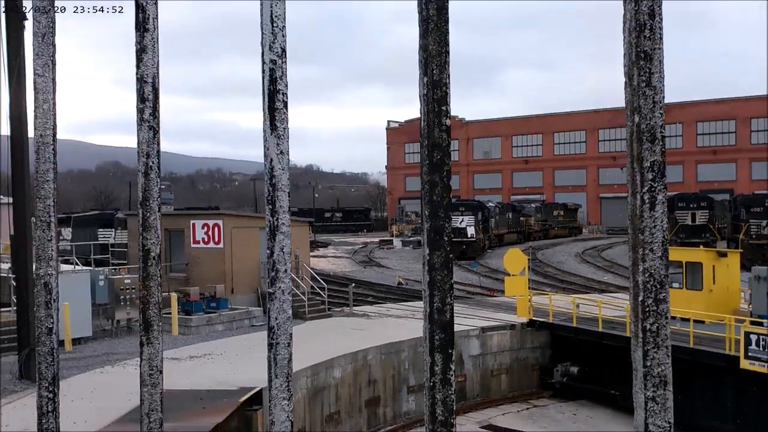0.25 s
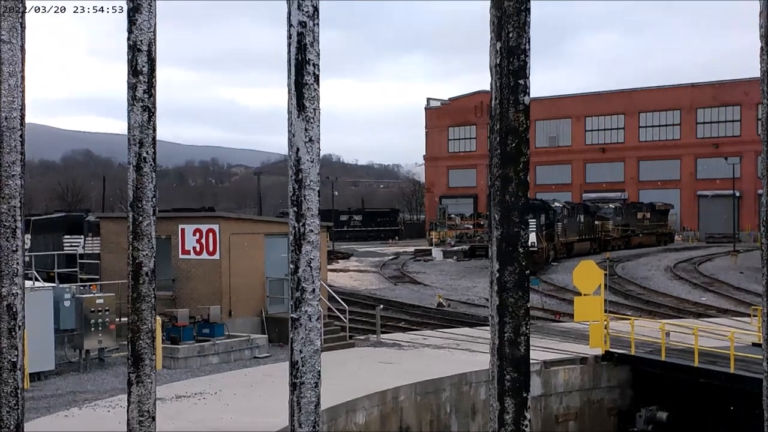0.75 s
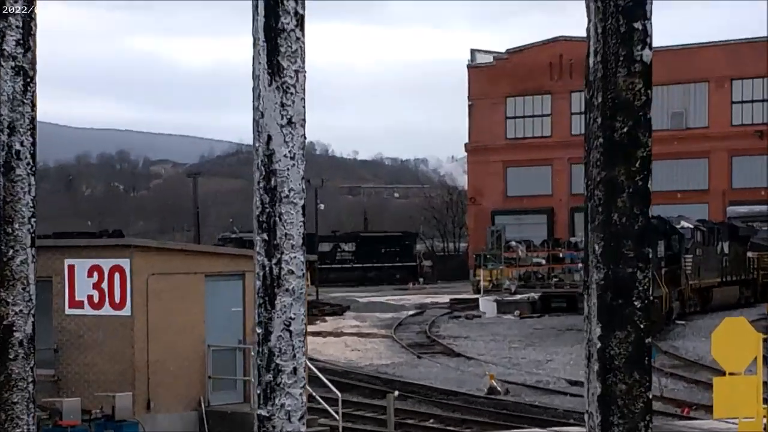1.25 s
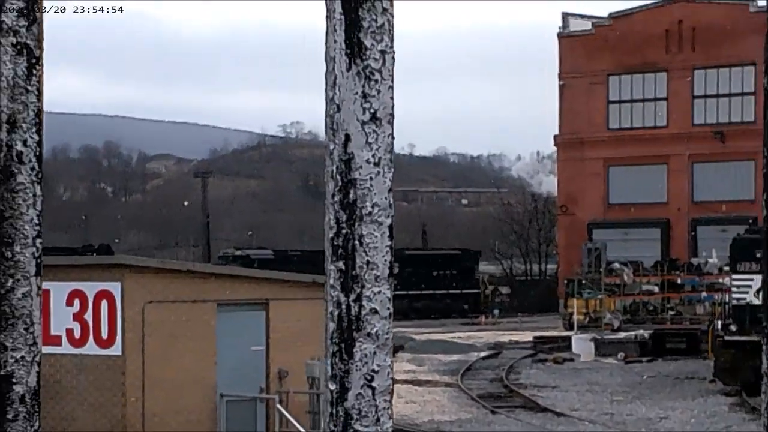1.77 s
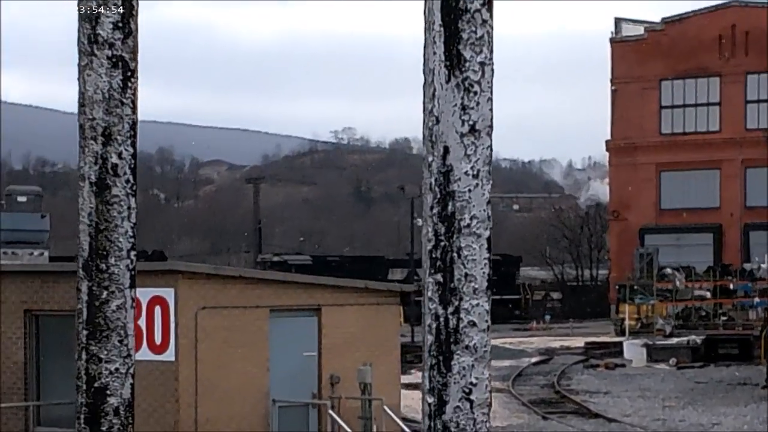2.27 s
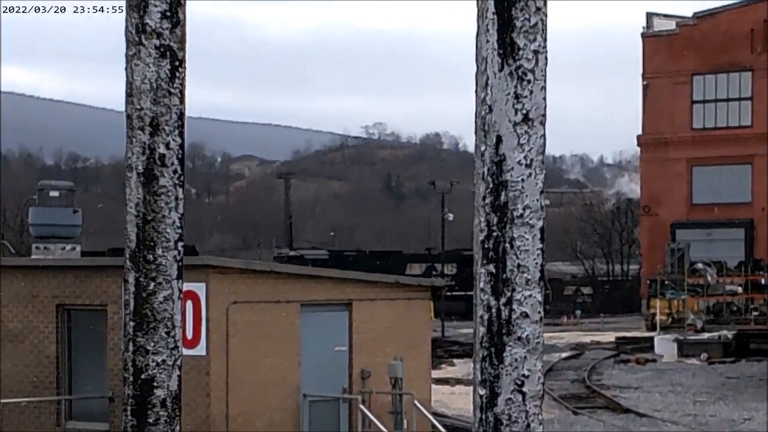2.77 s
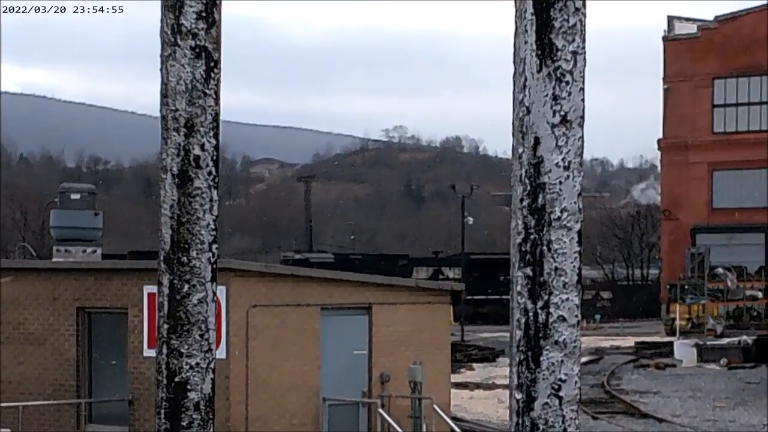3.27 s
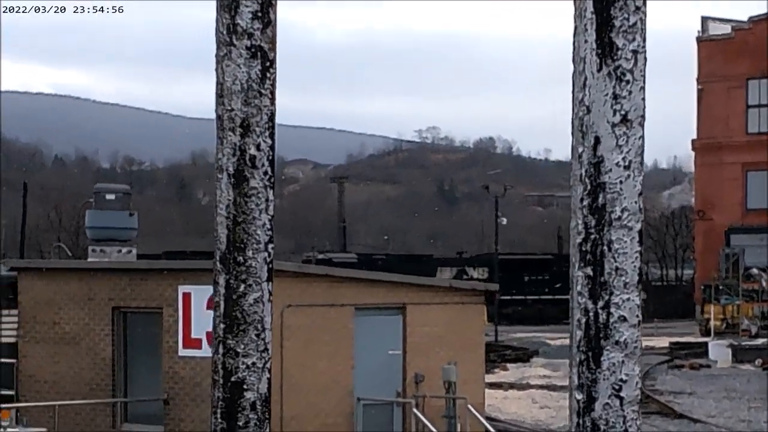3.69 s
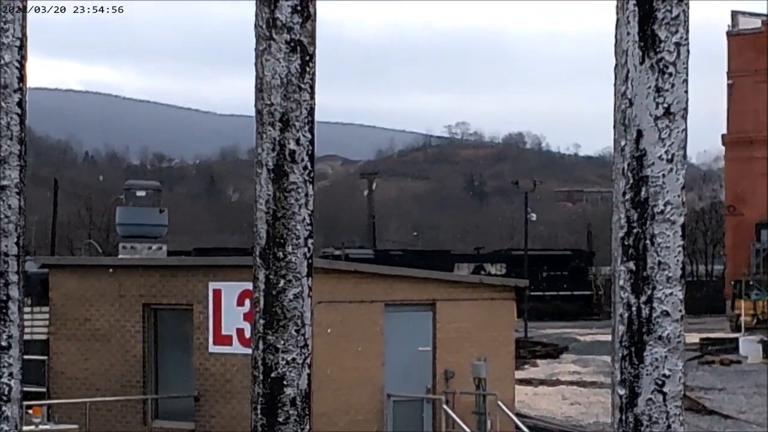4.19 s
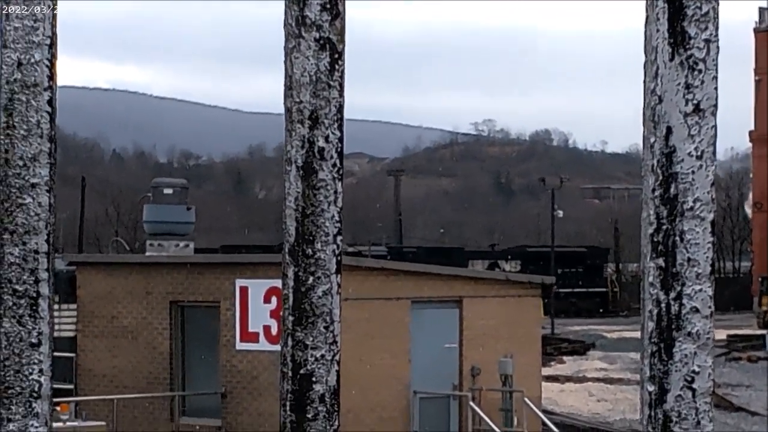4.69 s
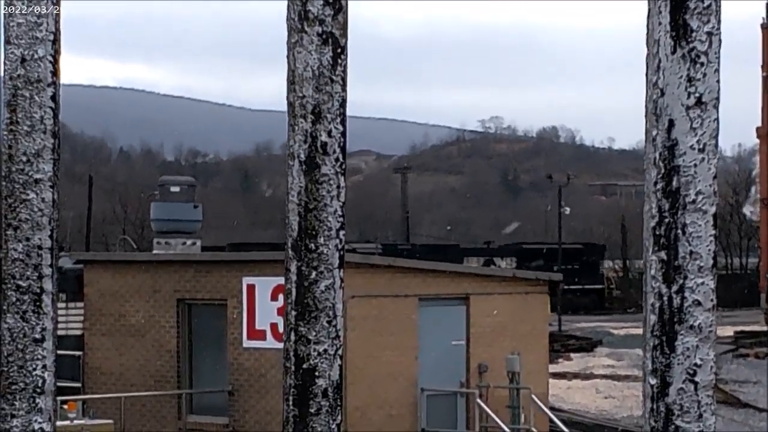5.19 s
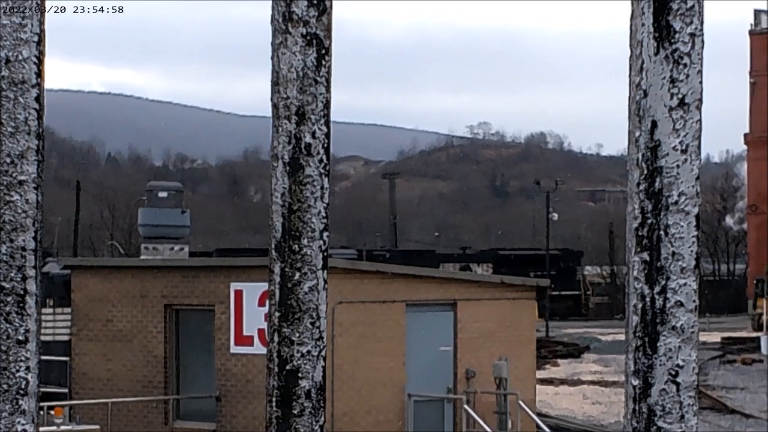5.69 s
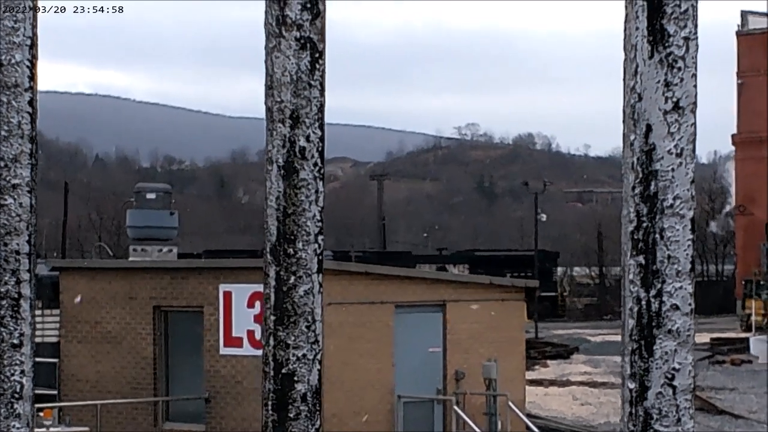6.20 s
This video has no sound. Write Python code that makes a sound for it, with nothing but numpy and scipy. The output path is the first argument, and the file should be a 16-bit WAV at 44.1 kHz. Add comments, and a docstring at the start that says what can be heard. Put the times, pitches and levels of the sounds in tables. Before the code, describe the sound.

Diesel locomotives idle in a rail yard with a deep rumble, while wind buffets the microphone and a few sharp clicks sound.

```python
"""Diesel locomotives idling in a rail yard.

Engine firing makes a low exhaust hum; distant machinery adds rumble, clatter, thin whines and an air leak.
Wind gusts rumble on the port of a small microphone, whose plastic case clicks in the hand.
The electronics add a steady hiss."""
import sys
import numpy as np
from scipy import signal
from scipy.fft import rfft, irfft, next_fast_len
from scipy.io import wavfile

SR = 44100
rng = np.random.default_rng(int(sys.argv[2]) if len(sys.argv) > 2 else 0)


def store_wav(level_fs):
    """Save 16-bit WAV to argv[1]."""
    pcm = np.round(np.clip(np.atleast_2d(level_fs), -1, 1) * 32767)
    wavfile.write(sys.argv[1], SR, pcm.T.astype(np.int16))


N = 284445


def exhaust():
    """Firing tone of an idling diesel over weaker crank orders; all follow one wavering speed."""
    # Each row: time in seconds, firing tone level in dB.
    firing_levels = [(0.0, -26.5), (0.12, -22), (0.93, -21.5), (1.1, -27), (1.3, -21), (1.47, -29.5),
                     (1.59, -23), (1.72, -26), (2.2, -21.5), (2.5, -16.5), (3.33, -20), (3.44, -19.5),
                     (3.98, -22), (4.13, -16), (4.24, -24), (4.35, -20), (5.25, -21.5), (5.9, -17),
                     (6.15, -17.5), (6.45, -14)]
    # Each row: frequency in Hz, level in dB.
    crank_orders = [(61.4, -46), (73.6, -37), (85.9, -41), (98.2, -41)]
    firing_hz = 49.62
    firing_db, = in_time(firing_levels)
    speed = 1 + 0.0053 * drift(3.3)
    orders = sum(amp(db + drift(2.8)) * tone(hz * speed) for hz, db in crank_orders)
    return amp(firing_db + 1.2 * drift(6.0)) * tone(firing_hz * speed) + orders


def machinery():
    """Distant engine rumble, casings rung by valve and pump noise, two whines and leaking air."""
    # Each row: time in seconds, relative clatter level in dB, upper whine in dB, air leak in dB.
    yard_levels = [(0.0, -47, -66, -53), (0.5, -49, -70, -64), (0.8, -48, -60.5, -58.5),
                   (1.35, -49, -67, -55), (2.1, -50, -65.5, -61.5), (2.35, -50.5, -62, -65),
                   (2.5, -50.5, -69, -64), (3.4, -48.5, -69, -64.5), (3.7, -49.5, -62, -65),
                   (4.1, -48.5, -68, -65), (4.35, -48.5, -61, -65), (4.7, -49, -60, -61.5),
                   (5.5, -51, -66.5, -69), (6.45, -52, -59, -66)]
    # Each row: frequency in Hz, relative spectral density in dB.
    rumble_spectrum = [(15, -23), (30, -5), (70, -1.5), (113, -13.5), (264, -11), (460, -18), (700, -25),
                       (1200, -39.5), (1500, -42), (2400, -38), (2600, -48.5), (3400, -54.5), (4600, -59),
                       (7000, -69.5)]
    # Each row: resonance in Hz, width in Hz, level in dB.
    casing_modes = [(1073, 355, -47.5), (1773, 180, -59), (2278, 100, -60.5), (3310, 90, -77),
                    (3500, 53, -75), (4255, 640, -70.5), (4290, 60, -77)]
    rumble_db, lower_whine_db = -27.5, -68
    upper_whine_hz, lower_whine_hz = 2717, 1934
    clatter_db, whine_db, leak_db = in_time(yard_levels)
    swell_db = clatter_db - clatter_db.mean()
    centres_hz, noise = bands(rumble_spectrum, together_db=.4, own_db=.8, rate_hz=8.0)
    treble_share = np.clip(np.log2(centres_hz / 500) / 2, 0, 1)[:, None]
    rumble = amp(rumble_db) * (noise * amp(treble_share * swell_db)).sum(axis=0)
    casings = sum(amp(db + swell_db + 2.3 * drift(15.0)) * narrow_noise(hz, width_hz)
                  for hz, width_hz, db in casing_modes)
    whines = amp(whine_db + 1.8 * drift(25.0)) * tone(upper_whine_hz + 2 * drift(15.0))
    whines += amp(lower_whine_db + 3.4 * drift(4.0)) * tone(lower_whine_hz + 2 * drift(21.0))
    leak = amp(leak_db + 2.0 * drift(9.8)) * narrow_noise(hz=2900, width_hz=480)
    return rumble + casings + whines + leak


def wind():
    """Turbulence on the microphone port: a breeze plus bell-shaped buffets that tilt its spectrum."""
    # Each row: frequency in Hz, relative spectral density in dB.
    wind_spectrum = [(9, -30), (15, -12), (48, -4), (128, -3.5), (376, -9), (455, -9.5), (651, -20),
                     (1200, -30), (1420, -39), (2380, -43), (2600, -47.5), (3000, -56.5), (3500, -62),
                     (5000, -84)]
    # Each row: time in seconds, level in dB.
    breeze_levels = [(0.0, -38.5), (0.8, -35), (1.2, -30.5), (1.6, -35.5), (2.0, -26), (2.4, -27),
                     (2.72, -26), (2.95, -15), (3.3, -14), (3.55, -14.5), (3.7, -20.5), (4.0, -24),
                     (4.45, -27.5), (4.7, -23.5), (5.35, -20), (5.57, -22.5), (5.9, -18.5), (6.1, -25.5),
                     (6.45, -24.5)]
    # Each row: peak time in seconds, level in dB, rise in seconds, tilt in dB per octave.
    buffets = [(1.747, -27.5, .04, -2), (2.211, -18, 0.05, -2.5), (2.487, -12.5, 0.039, 0),
               (2.598, -12.5, 0.031, -0.5), (2.809, -12, 0.018, -1.5), (3.236, -19, 0.05, 3.5),
               (3.569, -16.5, 0.027, 0), (3.822, -18, 0.027, -2), (4.104, -20, 0.058, -1),
               (4.744, -19.5, 0.025, -3), (4.917, -23, 0.037, 0), (5.64, -19, 0.018, -1.5),
               (5.784, -17.5, 0.014, 1), (5.976, -19.5, 0.078, 1.5), (6.141, -17.5, 0.019, -1)]
    breeze_db_per_oct, fall_to_rise = -1, 1.37
    breeze_db, = in_time(breeze_levels)
    power = amp(2 * breeze_db)
    weighted_tilt = power * breeze_db_per_oct
    for peak_s, db, rise_s, db_per_oct in buffets:
        age_s = np.arange(N) / SR - peak_s
        width_s = np.where(age_s > 0, fall_to_rise * rise_s, rise_s)
        buffet_power = amp(2 * db) * np.exp(-(age_s / width_s) ** 2)
        power += buffet_power
        weighted_tilt += buffet_power * db_per_oct
    centres_hz, noise = bands(wind_spectrum, together_db=1.5, own_db=0.88, rate_hz=48.0)
    octaves = np.log2(centres_hz / 250)[:, None]
    return np.sqrt(power) * (noise * amp(octaves * weighted_tilt / power)).sum(axis=0)


def case_clicks():
    """A snap and a burst of contact noise ring the plastic case; the hand damps the treble."""
    # Each row: start in seconds, gain in dB, decay in seconds, tilt in dB per octave, snap share 0-1.
    contacts = [(0.166, -12, .002, 1, 0.63), (0.19, -30, .004, -0.5, 0.4), (1.828, -29, 0.019, -2, 0.3),
                (2.041, -29, .012, -9, 0.1), (5.644, -28, 0.015, 3.5, 0.1),
                (5.6656, -18, 0.0017, 6.5, 0.25), (5.6672, -12.5, 0.0045, -1, 0.6)]
    # Each row: frequency in Hz, gain in dB, T60 in seconds.
    case_modes = [(620, -12, .03), (814, -5, 0.032), (978, -1, 0.038), (1183, 0, 0.024), (1440, -7, 0.014),
                  (1770, -7, 0.01), (2280, -8.5, 0.021), (2934, -9.5, .015), (3320, -9.5, 0.011),
                  (3830, -10, 0.011), (4150, -14.5, 0.013), (4360, -21.5, 0.0092), (5000, -19, 0.013),
                  (5760, -27.5, 0.014), (6230, -31, .008), (7740, -15, .007), (10500, -17, .005)]
    rise_s, hand_cutoff_hz = .004, 5250
    out = np.zeros(N)
    age_s = np.arange(SR // 10) / SR
    for start_s, click_db, decay_s, db_per_oct, snap in contacts:
        envelope = (1 - np.exp(-age_s / rise_s)) * np.exp(-age_s / decay_s)
        force = rng.standard_normal(len(age_s)) * envelope
        force *= (1 - snap) / np.sqrt(np.sum(force ** 2))
        force[0] = snap
        at = round(start_s * SR)
        for hz, mode_db, t60_s in case_modes:
            r, w = amp(-60 / (t60_s * SR)), 2 * np.pi * hz / SR
            ring = signal.lfilter([0, np.sin(w)], [1, -2 * r * np.cos(w), r * r], force)
            gain = amp(click_db + mode_db + db_per_oct * np.log2(hz / 1000))
            out[at:at + len(ring)] += gain * ring
    return signal.sosfilt(signal.butter(4, hand_cutoff_hz, fs=SR, output="sos"), out + 1e-18)


def electronics():
    """Steady circuit hiss, a faint high tone and a DC offset."""
    # Each row: frequency in Hz, relative spectral density in dB.
    hiss_spectrum = [(2000, 6.5), (5000, 0.5), (9000, -2), (17000, -3)]
    hiss_db, tone_db, dc_offset = -59, -85, -.0048
    _, noise = bands(hiss_spectrum, together_db=0.0, own_db=0.45, rate_hz=6.2)
    return amp(hiss_db) * noise.sum(axis=0) + amp(tone_db) * tone(hz=15197) + dc_offset


def amp(db):
    """Decibels to gain."""
    return 10 ** (np.asarray(db) / 20)


def rms_one(x):
    """Scale to rms 1."""
    return x / np.sqrt(np.mean(x ** 2) + 1e-20)


def in_time(rows):
    """Columns of a timed table, interpolated to every sample."""
    times_s, *columns = np.transpose(rows)
    return [np.interp(np.arange(N) / SR, times_s, column) for column in columns]


def drift(rate_hz):
    """Slow random wander of rms 1: coarse noise through two one-pole low-passes."""
    step, settle = 40, 2000
    r = np.exp(-2 * np.pi * rate_hz * step / SR)
    noise = rng.standard_normal(N // step + settle + 2)
    slow = signal.lfilter([1], [1, -2 * r, r * r], noise)[settle:]
    return np.interp(np.arange(N) / step, np.arange(len(slow)), rms_one(slow - slow.mean()))


def tone(hz):
    """Sine of rms 1 following a frequency."""
    return np.sqrt(2) * np.sin(2 * np.pi * (np.cumsum(hz * np.ones(N)) / SR + rng.random()))


def narrow_noise(hz, width_hz):
    """Noise twice through a two-pole resonance; rms 1."""
    r = np.exp(-np.pi * width_hz / SR)
    section = [1, 0, -1, 1, -2 * r * np.cos(2 * np.pi * hz / SR), r * r]
    return rms_one(signal.sosfilt([section, section], rng.standard_normal(N)))


def bands(spectrum, together_db, own_db, rate_hz):
    """Centres in Hz and third-octave noise bands that flicker together and alone; their sum has rms 1."""
    hz, db = np.transpose(spectrum)
    size = next_fast_len(N + SR)
    bins_hz = np.arange(size // 2 + 1) * SR / size
    colour = amp(np.interp(np.log(bins_hz + 1), np.log(hz), db))
    noise = irfft(colour * rfft(rng.standard_normal((2, size))), size)
    edges_hz = np.geomspace(hz[0], hz[-1], int(3 * np.log2(hz[-1] / hz[0])) + 1)
    centres_hz = np.sqrt(edges_hz[1:] * edges_hz[:-1])
    common_db = together_db * drift(rate_hz)
    out = np.zeros((len(centres_hz), N))
    for k in range(len(out)):
        bandpass = signal.butter(2, edges_hz[k:k + 2], "band", fs=SR, output="sos")
        band = signal.sosfilt(bandpass, noise[k % 2])[-N:]  # neighbours use independent noise
        out[k] = band * amp(common_db + own_db * drift(rate_hz))
    return centres_hz, out / np.sqrt(np.mean(out.sum(axis=0) ** 2))


def scene():
    """All sources at one microphone."""
    return (exhaust() + machinery() + wind() + case_clicks())[None, :]


def record(dry):
    """Circuit noise, soft clipping and a steep low-pass."""
    ceiling, cutoff_hz = .9, 15710
    clipped = ceiling * np.tanh((dry + electronics()) / ceiling)
    return signal.sosfilt(signal.ellip(16, .5, 55, cutoff_hz, fs=SR, output="sos"), clipped)


dry = scene()
out = record(dry)
store_wav(out)
```